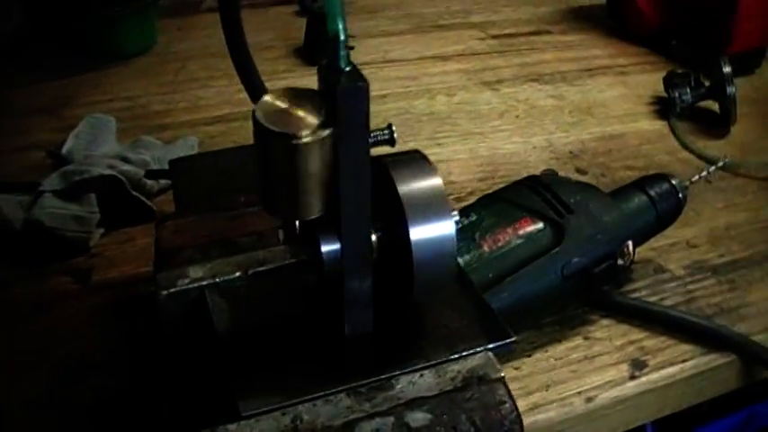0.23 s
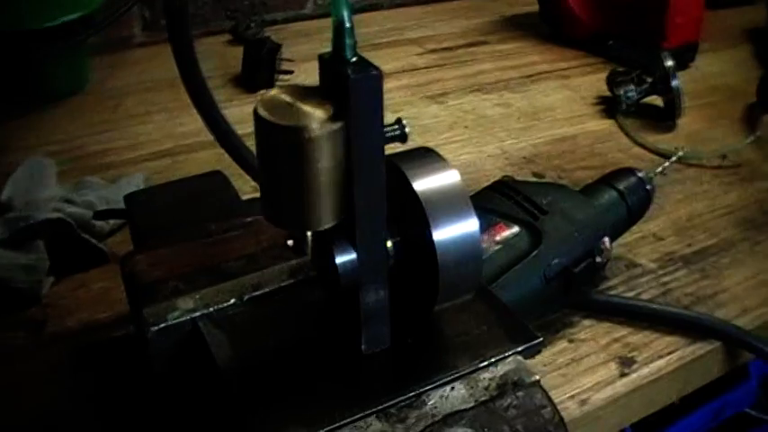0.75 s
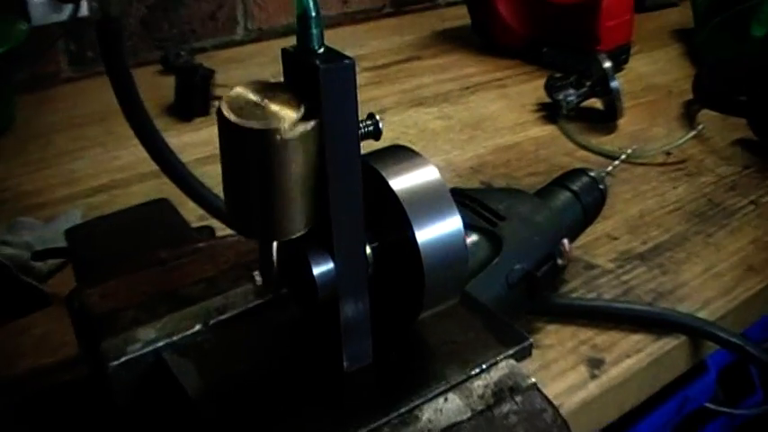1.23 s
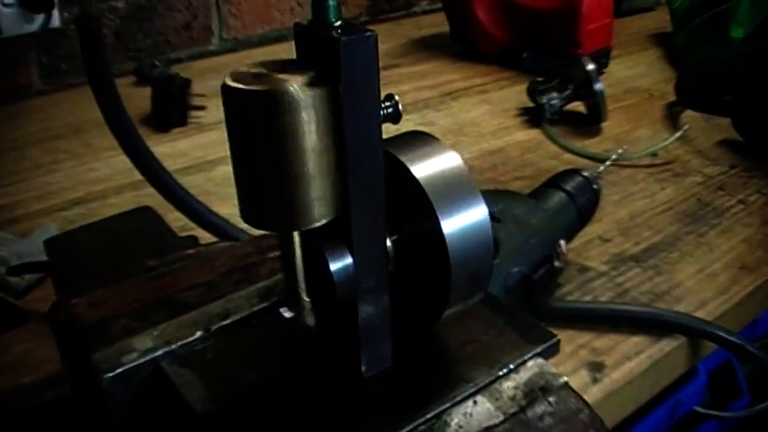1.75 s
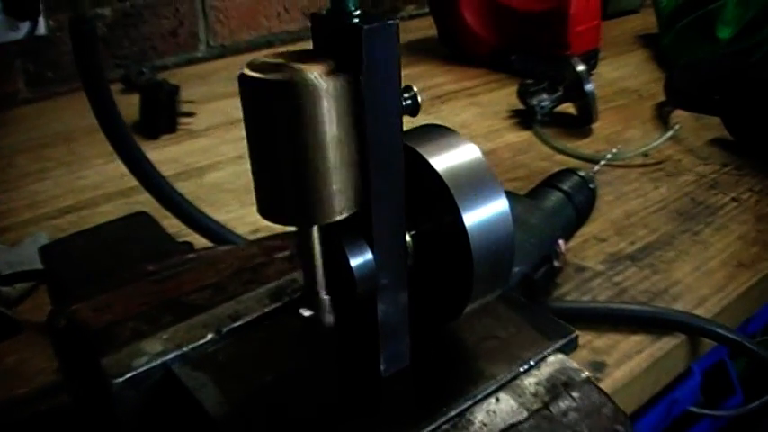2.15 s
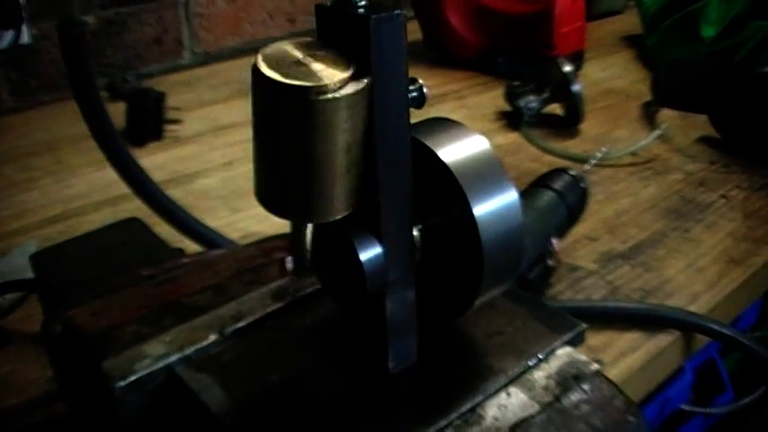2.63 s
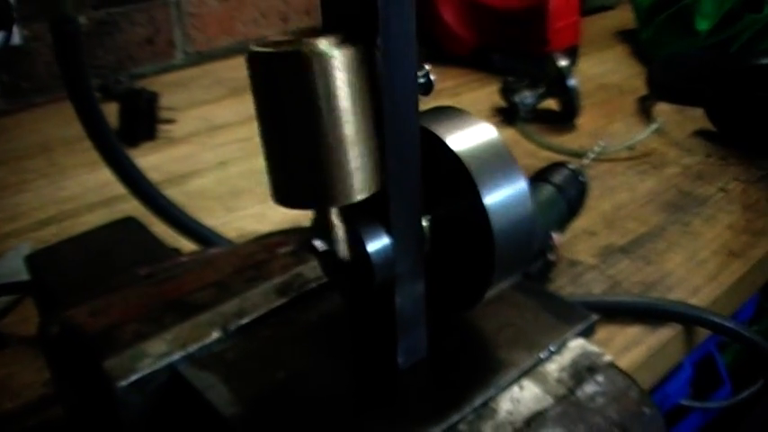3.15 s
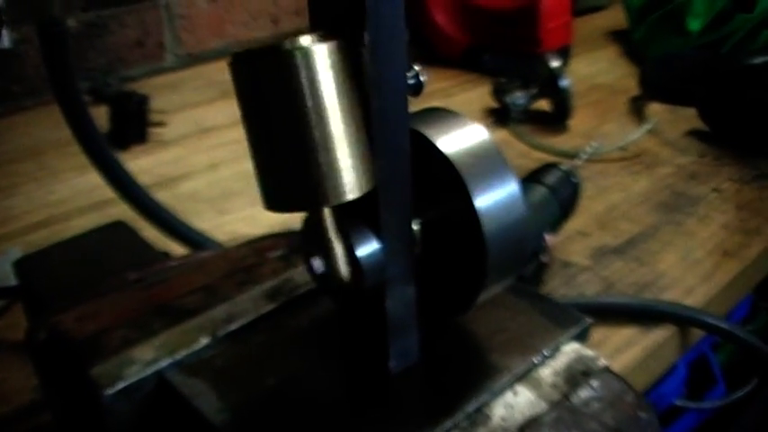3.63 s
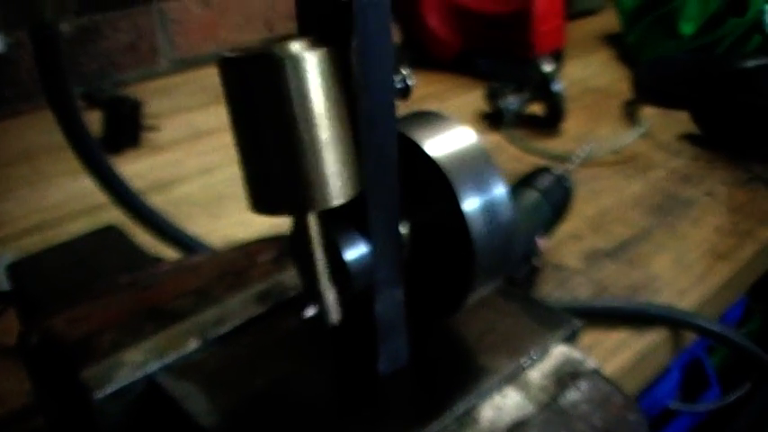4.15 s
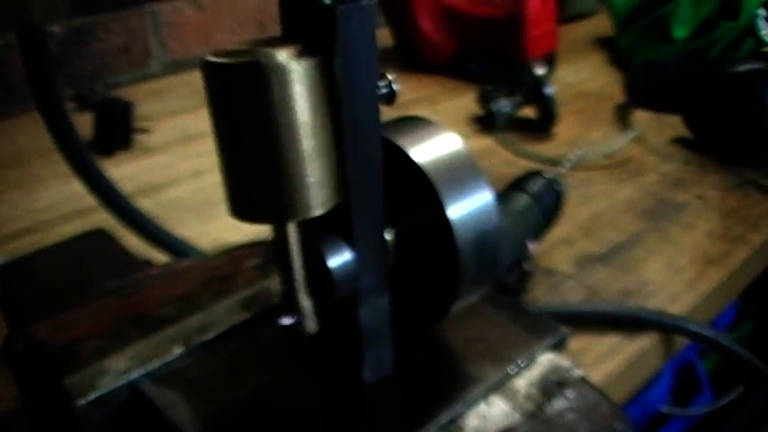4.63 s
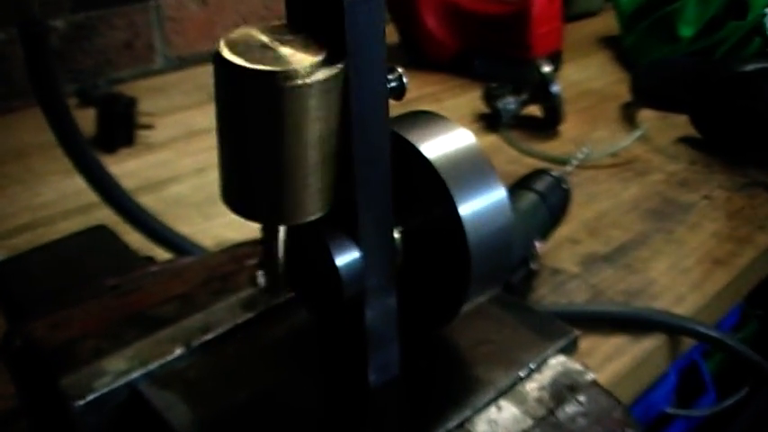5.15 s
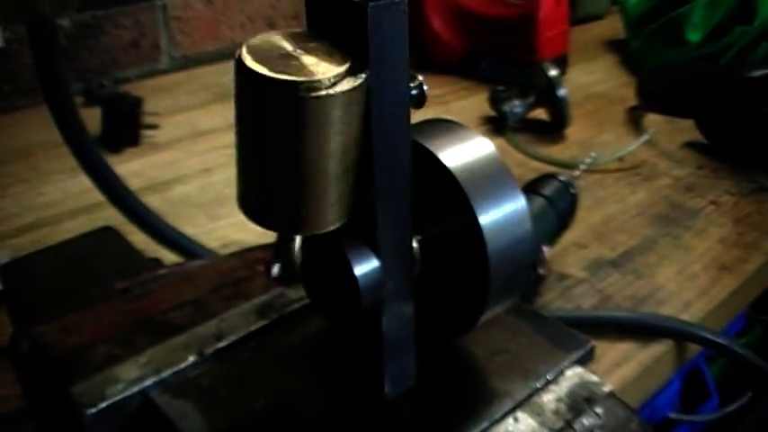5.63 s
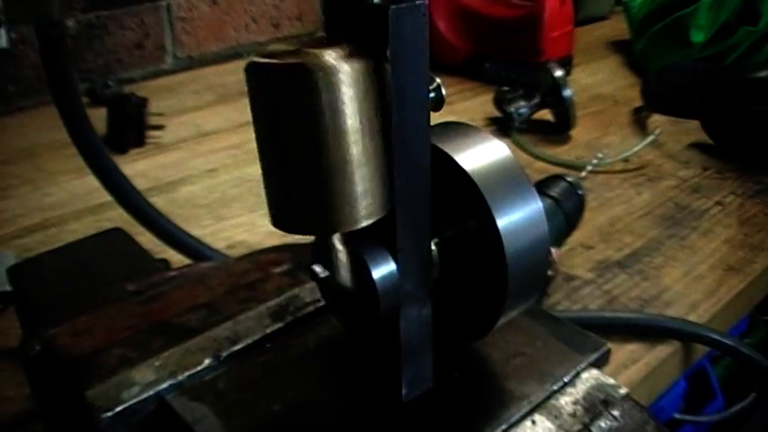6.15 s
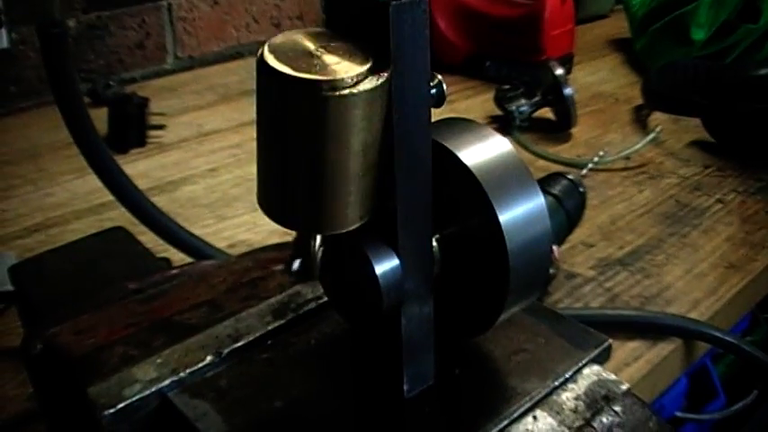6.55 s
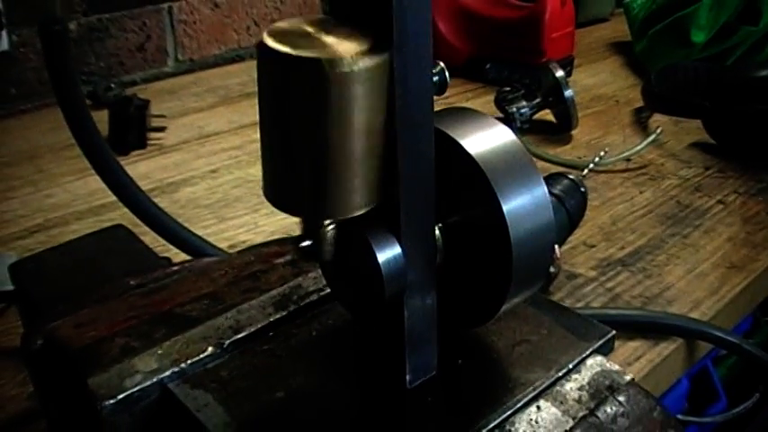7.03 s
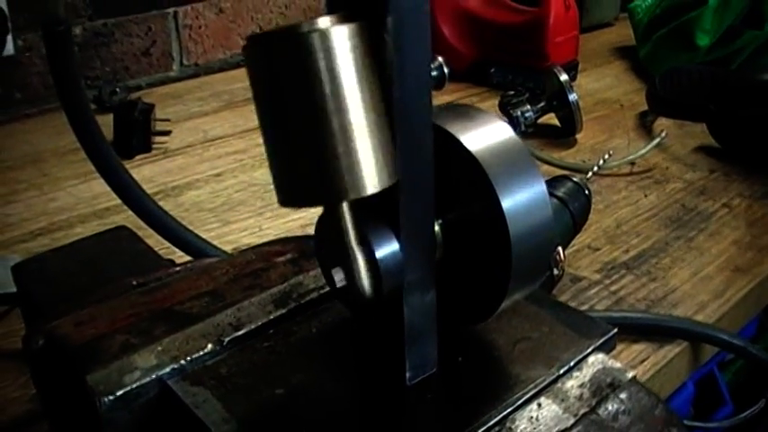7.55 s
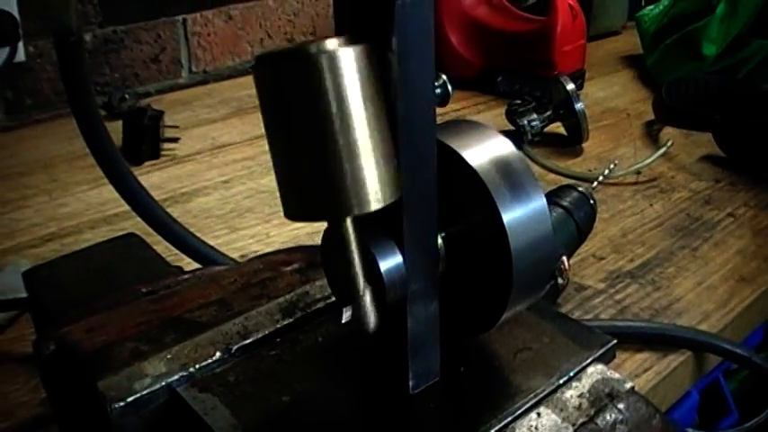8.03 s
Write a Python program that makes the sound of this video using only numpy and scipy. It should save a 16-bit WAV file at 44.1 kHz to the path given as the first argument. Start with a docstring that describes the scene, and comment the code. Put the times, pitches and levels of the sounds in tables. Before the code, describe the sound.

A small metal engine on compressed air runs close by, knocking and puffing six times a second, then easing to just over four.

```python
"""A small oscillating-cylinder engine on compressed air, clamped in a vice on a wooden bench in a small workshop.
Close to the microphone it starts at six turns a second, slows to just over four, then gains a little.
In each turn the exhaust port rasps and puffs, the piston and rod tick, air leaks at the inlet port,
the pivot ticks and the crank pin knocks. Air is shaped noise; blows ring decaying modes of metal and bench.
Echoes and a quiet floor of noise surround it."""
import sys
import numpy as np
from scipy import signal
from scipy.fft import rfft, irfft, next_fast_len
from scipy.io import wavfile

SR = 44100
rng = np.random.default_rng(int(sys.argv[2]) if len(sys.argv) > 2 else 0)


def generate_wav(sig):
    """Save sig (samples, or channels by samples) to the path in sys.argv[1] as 16-bit PCM at SR."""
    pcm = np.round(np.clip(np.atleast_2d(sig).T, -1, 1) * 32767).astype(np.int16)
    wavfile.write(sys.argv[1], SR, pcm)


N = 365588
TIME = np.arange(-SR // 2, N) / SR  # seconds; the engine is already running before time zero
AGE = np.arange(SR // 2) / SR  # seconds since a blow


def amp(db):
    """Decibels to gain."""
    return 10 ** (np.asarray(db) / 20)


def white():
    """White noise of rms 1."""
    return rng.standard_normal(len(TIME))


def colour(x, points):
    """Filter a signal by a (Hz, dB) spectrum, interpolated over log frequency."""
    hz, db = np.transpose(points)
    size = next_fast_len(len(x))
    bins_hz = np.fft.rfftfreq(size, 1 / SR)
    gain = amp(np.interp(np.log(bins_hz + 1), np.log(hz), db))
    return irfft(rfft(x, size) * gain, size)[:len(x)]


def noise(points):
    """Coloured noise of rms 1."""
    x = colour(white(), points)
    return x / x.std()


def band(x, lo_hz, hi_hz, order=2):
    """Band-pass."""
    return signal.sosfilt(signal.butter(order, [lo_hz, hi_hz], "band", fs=SR, output="sos"), x)


def unit(x):
    """Scale a response to energy 1."""
    return x / np.sqrt(np.sum(x ** 2))


def decay(t60):
    """Exponential decay that falls 60 dB in t60 seconds."""
    return np.exp(-np.log(1000) * AGE / t60)


def modes(table, signs=1):
    """Impulse response of a body: a sum of decaying sine modes."""
    hz, db, t60 = np.transpose(table)[:, :, None]
    partials = signs * amp(db) * decay(t60) * np.sin(2 * np.pi * hz * AGE)
    return unit(np.sum(partials, axis=0))


def echoes(t60, build):
    """Dense reflections that build up over a few milliseconds (build, in seconds) and die away."""
    return unit(rng.standard_normal(len(AGE)) * decay(t60) * np.minimum(AGE / build, 1) ** 2)


def ring(x, response):
    """Drive a body with a force."""
    return signal.fftconvolve(x, response)[:len(x)]


def blows(times, db):
    """One impulse per blow."""
    force = np.zeros(len(TIME))
    inside = times < TIME[-1]
    force[np.searchsorted(TIME, times[inside])] = amp(db)[inside]
    return force


def chatter(times, db, length, rough):
    """Blows followed by a brief scrape, different each time, as the parts settle; length in seconds."""
    force = blows(times, db)
    fade = signal.lfilter([1], [1, -np.exp(-1 / (length * SR))], force)
    return force + rough * fade * white() * np.sqrt(2 / (length * SR))


# The flywheel runs down and settles. Each row: time in seconds, speed in turns per second.
TURN_RATE = [(0.54, 6.135), (1.26, 5.6), (2.09, 4.889), (2.75, 4.542), (3.39, 4.345), (4.11, 4.275),
             (5.9, 4.378), (7.68, 4.399), (8.29, 4.446)]
FIRST_KNOCK_S = .1459  # the first knock after time zero


def crank():
    """Turns made, speed (0 slowest, 1 fastest) and the moments at which the crank pin knocks."""
    rate = np.interp(TIME, *np.transpose(TURN_RATE))
    turns = np.cumsum(rate) / SR
    turns = turns - np.interp(FIRST_KNOCK_S, TIME, turns)
    whole_turns = np.arange(np.ceil(turns[0]), turns[-1])
    knocks = np.interp(whole_turns, turns, TIME)
    return turns, (rate - rate.min()) / np.ptp(rate), knocks


# Metal frame and vice. Each row: mode in Hz, relative level in dB, t60 in seconds.
FRAME = [(1220, -27, 0.054), (1211, 2.5, 0.046), (1362, 12, 0.046), (1460, 22, 0.011), (1472, 3.5, 0.042),
         (1760, -62, 0.0083), (1824, 3, 0.065), (2670, -53, 0.0047), (2973, 7.5, 0.048),
         (3160, -46, 0.0041), (4430, 20, 0.012), (4770, -2, .01)]


def metal_frame():
    """The frame and vice ring as a set of short metallic modes."""
    return modes(FRAME)


# Bench top with its tools. Each row: mode in Hz, relative level in dB, t60 in seconds.
BENCH = [(102, -26.5, 0.55), (122.7, -16.5, 0.61), (141.5, -10, 0.32), (164.5, -12, 0.28),
         (195.5, -14, 0.2), (231.1, -12.5, .4), (310, 0.5, 0.15), (375, -2.5, 0.16), (437.7, 1.5, 0.16),
         (491.6, 4.5, 0.11), (549, -8, 0.23), (595, -5, 0.24), (661, -1.5, 0.11), (770, 2, 0.1),
         (843, -4.5, 0.23), (904, -4, 0.36), (970, -11.5, 0.096), (1110, -20, 0.086), (1125, 2, 0.42),
         (1375, 7.5, 0.072), (2196, -6, 0.17)]


def bench_top():
    """Neighbouring bench modes swing in opposite senses at the vice, so the wood answers late."""
    return modes(BENCH, signs=(-1) ** np.arange(len(BENCH))[:, None])


# Air through the ports over one turn. Each row: share of the turn after the knock, relative flow in dB.
PORT_FLOW = [(0, -65), (.014, -4), (.03, -13.5), (.085, -23), (.115, -8), (.2, -1.5), (.33, -1.5),
             (.47, -6.5), (.52, -10.5), (.58, -24.5), (.66, -12.5), (.73, -10), (.8, -9), (1, -4)]
# Spectrum of air at the exhaust port. Each row: frequency in Hz, relative level in dB per Hz.
EXHAUST_COLOUR = [(70, -34), (300, -13), (900, -15), (1550, 1), (2200, -13.5), (3500, -9.5), (5500, -9.5),
                  (7000, -7.5), (8200, -3), (8900, 1), (10000, -5.5), (11500, -12.5), (15500, -32.5)]
# Spectrum of air at the inlet port. Each row: frequency in Hz, relative level in dB per Hz.
INLET_COLOUR = [(70, -36), (300, -10), (900, -11), (1500, -0.5), (2200, -8.5), (3500, -7), (5500, -4.5),
                (7500, -3.5), (8800, 3), (9700, -0.5), (10800, -6.5), (12500, -12.5), (15500, -26)]
# Rasp of the exhaust as it cracks open. Each row: share of the turn after the knock, relative level in dB.
RASP_LEVEL = [(0, -60), (.085, -17), (.105, -3), (.125, 0), (.15, 0.5), (.17, -30), (.25, -4), (.4, -60),
              (1, -58)]
# Spectrum of the rasp. Each row: frequency in Hz, relative level in dB per Hz.
RASP_COLOUR = [(150, -40), (1000, -1.5), (2500, -5), (3500, -9), (4100, 4), (4700, -1.5), (5700, -6),
               (7100, 0), (8300, 1.5), (9500, -4.5), (11500, -16), (12400, -11), (15500, -29)]


def air(angle, speed):
    """Air hisses through the ports as the cylinder rocks over them, and rasps as the exhaust opens."""
    flow = amp(np.interp(angle, *np.transpose(PORT_FLOW)) + 0.5 * speed)
    # the fuller cylinder of a fast stroke makes the exhaust hole sing
    whistle = amp(-27.5) * speed * band(white(), 7600, 8850)
    low_rush = amp(-31.5) * band(white(), 164, 400, order=4)
    exhaust = amp(-36.5) * noise(EXHAUST_COLOUR) + whistle + low_rush
    inlet = amp(-36.0) * noise(INLET_COLOUR)
    hiss = flow * np.where(angle < .62, exhaust, inlet)
    rasp = amp(np.interp(angle, *np.transpose(RASP_LEVEL)) - 35) * noise(RASP_COLOUR)
    flutter = amp(1.46 * noise([(20, 23), (300, 0), (900, -65)]))  # level wavers by 1.46 dB rms
    return flutter * (hiss + rasp)


def puffs(angle, speed, frame, bench):
    """The cylinder empties with a soft thump; at speed more pressure is left, and the jet shakes the frame."""
    times = TIME[1:][np.diff(1 * (angle > .105)) > 0]  # the exhaust opens
    push = np.sqrt(np.interp(times, TIME, speed))
    thump_force = chatter(times, 4 * push, length=0.0088, rough=0.42)
    thump = amp(-10.5) * band(ring(thump_force, bench), 272, 634, order=3)
    surge_db = 14 * (push - 1)
    surge = chatter(times, surge_db, length=.02, rough=0.24)
    bench_boom = amp(1.5) * ring(surge, bench)
    echo_boom = amp(-6) * ring(surge, echoes(t60=0.63, build=.01))
    boom = band(bench_boom + echo_boom, 106.6, 243, order=5)
    jet = chatter(times, surge_db, length=0.013, rough=2.18)
    shaken = band(amp(-18.5) * ring(jet, frame) + amp(-12.5) * jet, 387, 3650, order=4)
    return thump + boom + shaken


SEATED_SPEED = .7  # above this speed (0-1) the load keeps the joints seated and their ticks fade
TICK_SCATTER_DB, TICK_SCATTER_S = 1.5, .0006  # rms, from turn to turn


def snaps(joint, knocks, speed):
    """Times and levels of a joint's ticks: once a turn near the same crank angle, never quite alike."""
    slow_share, fast_share, slow_db, fast_db = joint
    late, strong = rng.standard_normal((len(knocks), 2)).T
    share = slow_share + (fast_share - slow_share) * speed
    after = share / np.interp(knocks, *np.transpose(TURN_RATE))
    db = np.interp(speed, [SEATED_SPEED, 1], [slow_db, fast_db])
    return knocks + after + TICK_SCATTER_S * late, db + TICK_SCATTER_DB * strong


# Steel rod and pins. Each row: mode in Hz, relative level in dB, t60 in seconds.
STEEL = [(3460, -9, 0.001), (5030, -13.5, 0.0076), (6330, -10, 0.0065), (6730, 3, 0.0048),
         (7500, 8.5, 0.0034), (8700, 1, 0.0019), (9050, -24, 0.0016)]


def tick(times, db, frame, steel_db, frame_db, ring_hz, length, rough):
    """A loose joint snaps over: a bright steel click and a short ring of the frame."""
    click = band(ring(chatter(times, db, length, rough), modes(STEEL)), 1780, 8800, order=4)
    frame_force = band(chatter(times, db, length, rough=0.48), ring_hz / 1.131, ring_hz * 1.115)
    return amp(steel_db) * click + amp(frame_db) * ring(frame_force, frame)


# Where each loose joint changes sides. Each holds: share of the turn after the knock when slow,
# the same at full speed, relative level in dB when slow, the same at full speed.
PISTON = (.214, .258, 0, -12)
ROD = (.325, .301, -.5, -14)
PIVOT = (-.114, -.099, -.5, -5.5)
# Slow change in the rod's tick. Each row: time in seconds, relative level in dB.
ROD_LEVEL = [(1.4, 0), (4.3, -1.5), (5.6, 1), (6.6, -1.3), (7.6, 2.5), (8.2, 1)]


def ticks(knocks, frame, speed):
    """Piston, rod and pivot each change sides once a turn; the rod bounces once, high and thin."""
    piston_s, piston_db = snaps(PISTON, knocks, speed)
    rod_s, rod_db = snaps(ROD, knocks, speed)
    rod_db = rod_db + np.interp(knocks, *np.transpose(ROD_LEVEL))
    pivot_s, pivot_db = snaps(PIVOT, knocks, speed)
    piston = tick(piston_s, piston_db, frame, steel_db=-21, frame_db=-4, ring_hz=1556, length=0.0033, rough=1.8)
    rod = tick(rod_s, rod_db, frame, steel_db=-9.5, frame_db=-1, ring_hz=1783, length=0.0013, rough=0.83)
    pivot = tick(pivot_s, pivot_db, frame, steel_db=-16, frame_db=-2, ring_hz=1790, length=0.0015, rough=0.94)
    bounce = ring(chatter(rod_s + 0.00091, rod_db, length=.001, rough=1.4), modes(STEEL))
    return piston + rod + pivot + amp(-15) * band(bounce, 5060, 9800, order=3)


# Strength of the crank pin's knock, once a turn. Each row: time in seconds, relative level in dB.
KNOCK_LEVEL = [(.6, 3.6), (1.6, 1.7), (3.1, -1.1), (4.3, -1.3), (5.5, .6), (7.1, .3), (8.2, 2)]
KNOCK_SCATTER_DB = .5  # rms, from turn to turn


def knock(times, frame, bench, speed):
    """The crank pin takes up its play; three early reflections follow. Hammering and rattle grow with speed."""
    scatter_db = KNOCK_SCATTER_DB * rng.standard_normal(len(times))
    db = np.interp(times, *np.transpose(KNOCK_LEVEL)) + scatter_db
    force = chatter(times, db, length=0.006, rough=0.13)
    for delay_s, drop_db in [(.0049, 10), (.0093, 15), (.0195, 17)]:  # early reflections
        force = force + blows(times + delay_s, db - drop_db)
    body = amp(-2) * ring(band(force, 1073, 2030, order=3), frame)
    hammer_db = db + 15 * (np.tanh(2.2 * speed) - 1)
    rattle_force = chatter(times, hammer_db, length=0.0098, rough=4.38)
    rattle = amp(-11.5) * band(rattle_force, 2350, 4680, order=3)
    crack = amp(-8.5) * band(force, 2140, 4680, order=4)
    sharp_force = chatter(times, 2 * hammer_db, length=0.0062, rough=2.18)
    sharp = amp(-16) * band(sharp_force, 4800, 8600, order=3)
    wood = amp(-8) * band(ring(force, bench), 145, 3250, order=3)
    return body + rattle + crack + sharp + wood


# Tone of the room's echoes. Each row: frequency in Hz, gain in dB.
ROOM_COLOUR = [(60, -16), (150, 0), (300, 1), (1000, -0.5), (1600, -14.5), (3000, -11), (8000, -23.5),
               (15000, -29)]


def workshop(x):
    """Echoes from the wall and the tools; the bass lingers longest."""
    bright = ring(x, echoes(t60=0.27, build=0.0091))
    bass = band(ring(x, echoes(t60=0.35, build=0.024)), 110, 306)
    return colour(bright, ROOM_COLOUR) + amp(-2.5) * bass


# Steady background noise. Each row: frequency in Hz, relative level in dB.
FLOOR = [(20, -1), (45, -5), (65, 3), (90, 1), (150, 3.5), (350, 4), (900, -4), (1400, -1.5), (2300, -13),
         (8000, -15), (15500, -34)]
# Sound scattered sideways by nearby surfaces. Each row: frequency in Hz, side gain in dB.
WIDTH = [(60, -17), (300, -23), (700, -20), (1400, -24), (4400, -26), (8000, -15), (15000, -7)]
# Lean of the stereo image. Each row: frequency in Hz, left minus right in dB.
BALANCE = [(100, 1.1), (600, 2.1), (1400, .8), (3000, .3), (6000, 2.1), (14000, 2.3)]


def scene():
    """The crank angle drives everything; speed is 0 at the slow tick-over and 1 at the fastest."""
    turns, speed, knocks = crank()
    angle, turn_speed = turns % 1, np.interp(knocks, TIME, speed)
    frame, bench = metal_frame(), bench_top()
    engine = air(angle, speed) + puffs(angle, speed, frame, bench)
    engine = engine + ticks(knocks, frame, turn_speed) + knock(knocks, frame, bench, turn_speed)
    mid = engine + amp(-4.5) * workshop(engine) + amp(-51.5) * noise(FLOOR)
    scatter = colour(ring(engine, echoes(t60=.04, build=.001)), WIDTH)
    side = scatter + amp(-21.5) * workshop(engine) + amp(-57) * noise(FLOOR)
    channels = []
    for sign in (1, -1):  # left, right
        tilt = [(hz, sign * db / 2) for hz, db in BALANCE]
        channels.append(colour(mid + sign * side, tilt)[-N:])
    return np.array(channels)


TOP_HZ = 15750  # upper limit of the recorder


def record(dry):
    """The microphone drops the deepest bass and the recorder cuts the top."""
    lean = signal.sosfilt(signal.butter(2, 42, "high", fs=SR, output="sos"), dry)
    return signal.sosfilt(signal.ellip(10, .1, 80, TOP_HZ, fs=SR, output="sos"), lean)


dry = scene()
out = record(dry)
generate_wav(out)
```